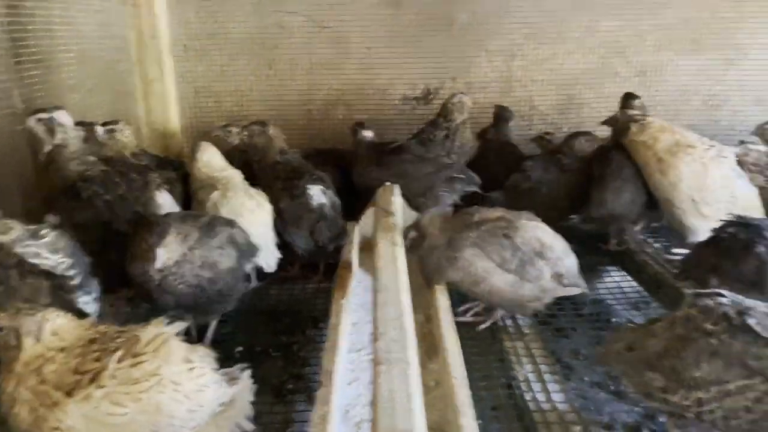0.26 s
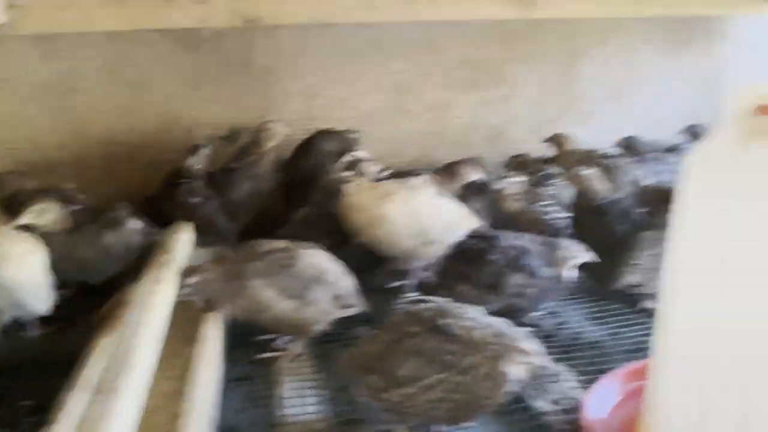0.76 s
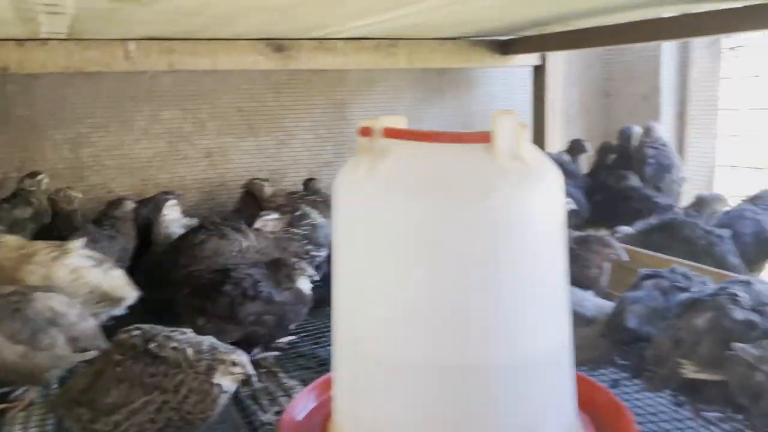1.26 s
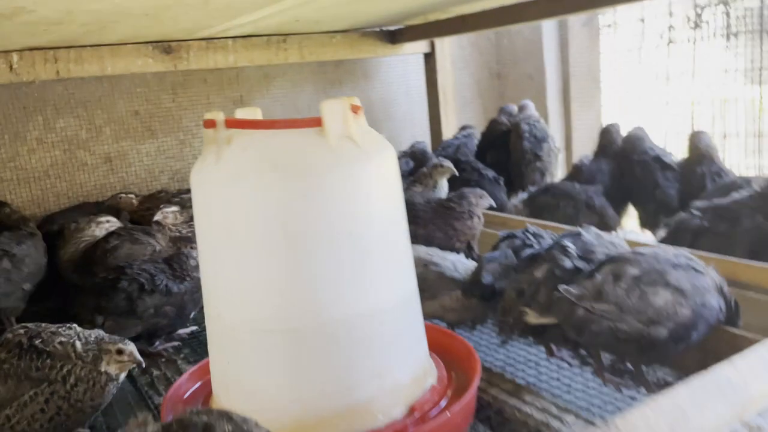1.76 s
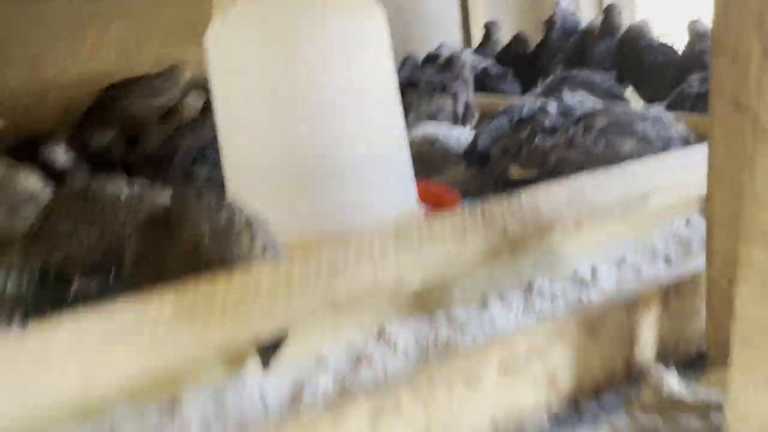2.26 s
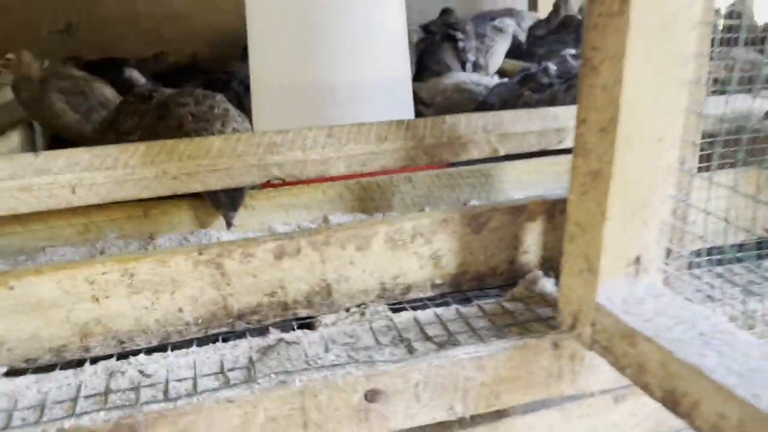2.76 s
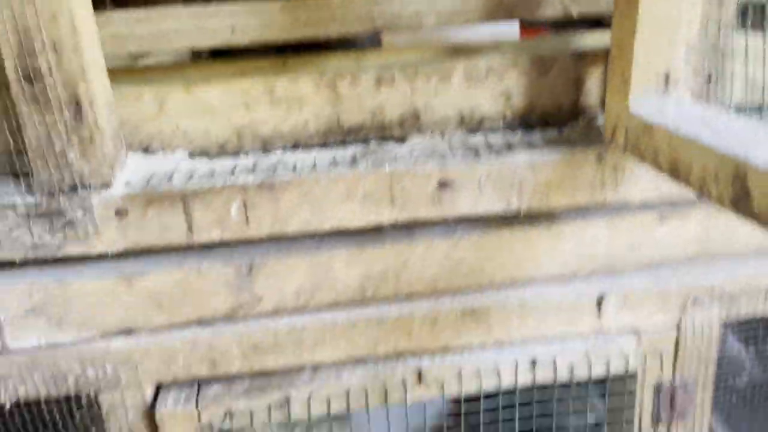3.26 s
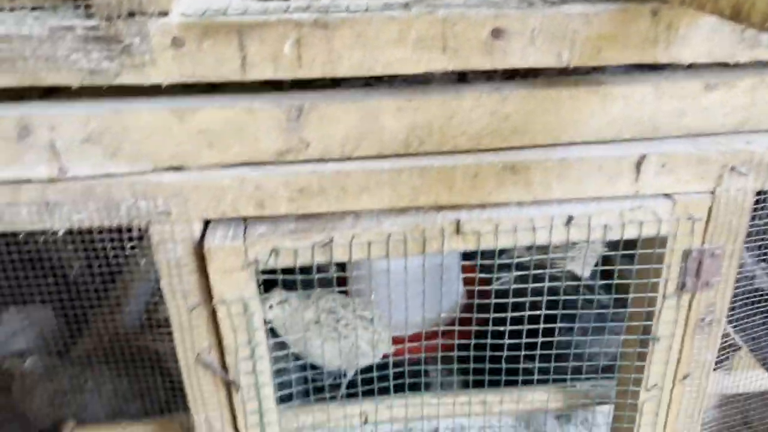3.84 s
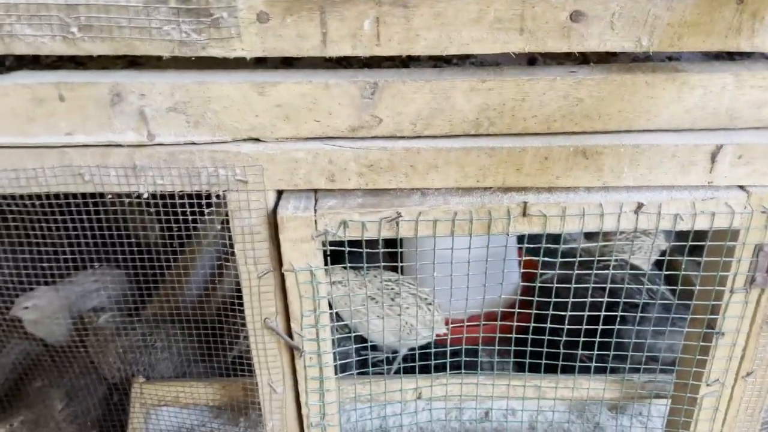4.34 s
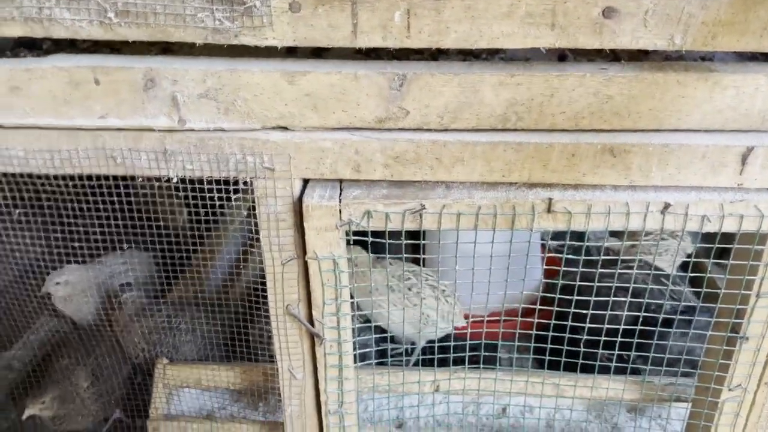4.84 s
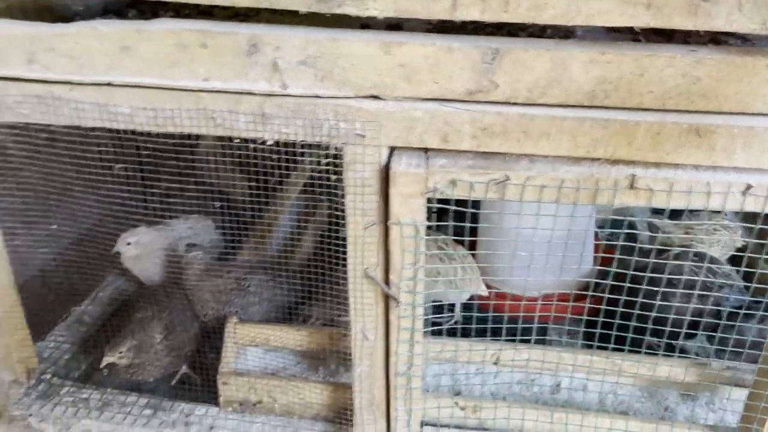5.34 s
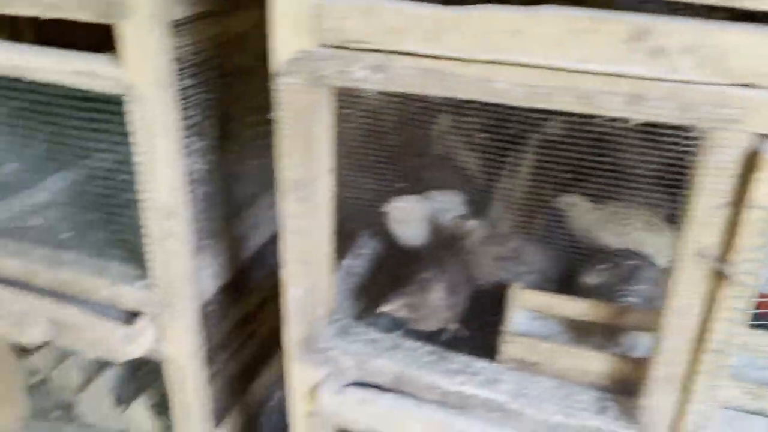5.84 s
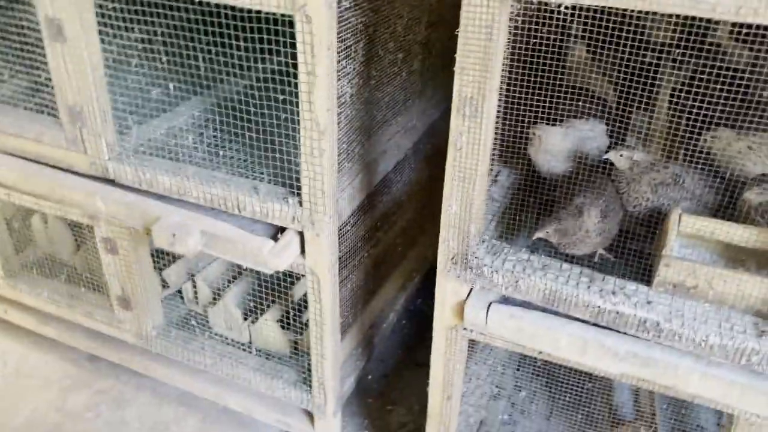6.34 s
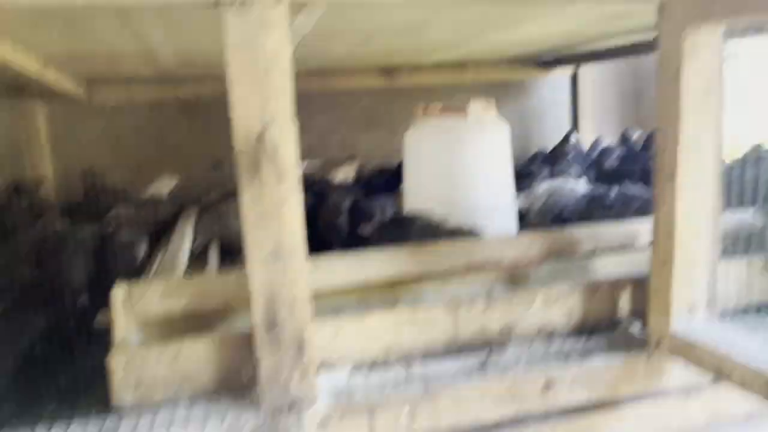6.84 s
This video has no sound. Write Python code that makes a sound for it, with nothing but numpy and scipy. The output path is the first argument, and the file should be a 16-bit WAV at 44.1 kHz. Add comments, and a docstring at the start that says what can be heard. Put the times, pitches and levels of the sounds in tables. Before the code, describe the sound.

Fast swooping quail trills burst out one after another, turning hoarse, with soft peeps, beak taps, claw clicks and a distant flock chattering over quiet rumble.

```python
"""Quail trill in wooden, wire-fronted cages in a farm shed: six trills, one after another.
Each is a whistle swooping up and down some 20 to 30 times a second; most fray into a rasp of shaped noise.
Around them: gliding chirps and soft peeps, clicks ringing a feeder board (pecks) or wire mesh (claws).
Beneath: a wavering hum, rumble and rustle of shaped noise, chatter of a farther flock, a faint far cock crow.
Caged sounds pass through quick echoes, ringing cage modes and a longer shed tail."""
import sys
import numpy as np
from scipy import signal
from scipy.fft import rfft, irfft, next_fast_len
from scipy.io import wavfile
from scipy.ndimage import uniform_filter1d, minimum_filter1d

SR = 44100
rng = np.random.default_rng(int(sys.argv[2]) if len(sys.argv) > 2 else 0)


def file_out(sig):
    """Save sig as 16-bit WAV at sys.argv[1]."""
    # one column per channel
    cols = np.atleast_2d(sig).T
    # limit, then scale
    lim = np.clip(cols, -1, 1)
    pcm = np.round(lim * 32767).astype(np.int16)
    wavfile.write(sys.argv[1], SR, pcm)


N = 313110
TIME = np.arange(N) / SR

# Shed rumble and rustle spectra: f/Hz, relative density/dB
RUMBLE_SPECTRUM = [(15, -45), (25, -26), (54, 2.5), (112, -6.5), (139, -8), (177, -1), (215, -10.5),
                   (264, -6.5), (358, -19.5), (450, -14), (580, -64), (990, -120)]
RUSTLE_SPECTRUM = [(210, -56), (350, -8.5), (497, -2), (565, -2.5), (641, -4.5), (740, -1.5), (940, -5),
                   (1160, -5), (1780, -11.5), (2870, -15.5), (3650, -22.5), (5180, -21.5), (8620, -26),
                   (13900, -15), (15800, -62)]
# Machine hum lines: f/Hz, relative level/dB
HUM_LINES = [(53.8, -58.5), (107.7, -54.5), (177.6, -51)]
# Left-right correlation of the shed noise: f/Hz, correlation/-1..1
EAR_CORRELATION = [(60, 0.75), (130, 1), (290, 0.65), (640, -0.43), (1410, 0.012), (3100, 0.22),
                   (6820, -0.76), (15000, -0.82)]
# Course of the low background, used relative to its median: t/s, level/dB
BACKGROUND_COURSE = [(0.0, -45), (0.71, -39.5), (1.01, -42.5), (1.05, -34), (1.26, -38.5), (1.34, -36),
                     (1.42, -40), (1.76, -40), (2.23, -42.5), (4.47, -40), (4.65, -40), (4.81, -51.5),
                     (4.96, -37.5), (5.04, -44), (5.22, -57), (5.57, -47.5), (7.1, -46.5)]
# Claws on the wire floor: t/s, click level/dB
CLAW_BLOWS = [(0.0387, -38), (0.4763, -41), (1.2974, -33), (1.7453, -34), (2.4112, -32.5), (3.4214, -35.5),
              (3.5129, -41), (3.7797, -33.5), (4.2727, -40), (5.9734, -37.5), (6.2144, -33.5),
              (6.2806, -31.5), (6.831, -38.5)]
# Wire tick spectrum: f/Hz, relative density/dB
WIRE_SPECTRUM = [(800, 1.5), (2000, 5.5), (5000, 2.5), (7000, -5), (9000, -15), (12000, 3.5), (15500, -5)]
# Soft peeps from the back of the cages: t/s, length/s, start f/Hz, middle f/Hz, end f/Hz, level/dB
PEEP_NOTES = [ (0.253, 0.039, 3540, 2900, 2600, -54), (1.594, 0.023, 2830, 2930, 2900, -47),
              (1.331, 0.061, 2470, 2700, 2550, -42), (1.833, 0.064, 2720, 2854, 2810, -42),
              (1.878, 0.048, 5080, 3950, 3430, -59), (2.012, 0.043, 4400, 3570, 3300, -55),
              (2.082, 0.035, 3750, 4200, 4400, -51), (3.283, 0.058, 2920, 2940, 2620, -49.5),
              (3.325, 0.065, 3430, 3073, 3240, -47), (4.398, 0.051, 2880, 2970, 2620, -41.5),
              (4.856, 0.018, 5030, 3670, 3380, -55), (6.666, 0.055, 2700, 2860, 2530, -50)]
# Chirps of nearby birds: t/s, length/s, start f/Hz, middle f/Hz, end f/Hz, level/dB, rasp/0-1,
# pan (left over right)/dB, cage echo/dB
CHIRP_NOTES = [ (0.515, 0.025, 1633, 1934, 2080, -24.5, 0.2, 2, 6),
               (0.537, 0.013, 2070, 2088, 2000, -11.5, 0, 4, -2),
               (0.541, 0.02, 1690, 1647, 1670, -19.5, 0.08, 5.5, -1),
               (0.657, 0.036, 1750, 2287, 2720, -17, 0.15, 2.5, -5),
               (.674, 0.019, 4200, 4020, 3800, -27, 0.09, 5, -6),
               (0.694, 0.026, 2454, 2724, 2400, -17.5, 0.21, 5, -9),
               (2.233, 0.046, 1440, 1720, 1485, -21.5, 0.37, 2.5, 6),
               (2.323, 0.033, 1422, 1780, 3980, -19.5, 0.38, 1, 12),
               (2.345, 0.035, 3438, 2070, 1650, -14, 0.24, 5, -1.5),
               (3.702, .040, 1370, 2160, 2720, -24, 0.57, 1.5, 4),
               (3.735, 0.059, 2160, 1604, 1360, -31.5, 0.77, 4.5, 20),
               (4.696, 0.048, 1820, 1609, 1507, -13, 0.13, 9, -10.5),
               (5.879, 0.027, 1260, 1282, 1380, -32.5, 0.44, 3, 13),
               (5.978, 0.043, 1442, 1892, 1500, -33.5, 0.38, 0, 18)]
# Bird behind each trill: start t/s, end t/s, turn to late hoarseness t/s, swoop/octaves,
# early hoarseness/0-1, late hoarseness/0-1, crest shake/0-1, overtones/dB, facing/0-1,
# top octave/dB, pan (left over right)/dB, left lag/ms, cage echo/dB
TRILL_BIRDS = [ (0.825, 1.216, 1.01, 0.62, 0.05, 0.73, 0.34, -20.5, 0.15, 3, 4, 0.0083, 5.5),
               (2.528, 2.869, 3.04, 0.76, 0.21, 0.05, 0.52, -32, 0.05, -1.5, 2.5, -0.052, 1.5),
               (3.858, 4.305, 4.12, 0.78, 0.24, 0.83, 0.57, -32, 0, -2.5, 3, 0.21, 3.5),
               (4.991, 5.435, 5.21, 1.093, 0.03, 0.55, 0.48, -23.5, 0.65, 2.5, 6.5, 0.081, -7.5),
               (5.461, 5.89, 5.765, .64, .12, 0.87, 0.45, -32, 0.02, -0.5, 2, -.65, -1),
               (6.111, 6.512, 6.37, 0.63, 0.15, 0.87, 0.51, -21.5, 0.08, 0, 3, 0.34, 5.5)]
# Trill syllables, a low note and the crest after it: t/s, note f/Hz, note level/dB, crest level/dB
TRILL_SYLLABLES = [ (.833, 1900, -19, -20), (.868, 2395, -18, -17.5), (0.905, 2480, -18, -21),
                   (.944, 2750, -16.5, -17), (0.983, 2850, -22.5, -23), (1.02, 3036, -16.5, -27),
                   (1.058, 3080, -20, -28), (1.091, 3000, -22, -24), (1.125, 2890, -23, -24.5),
                   (1.159, 2750, -25, -26.5), (2.538, 1450, -42.5, -18.5), (2.58, 1751, -22, -16.5),
                   (2.626, 1800, -21, -16), (2.674, 1916, -17.5, -16), (2.722, 1786, -20.5, -16.5),
                   (2.767, 1842, -17.5, -23.5), (2.812, 1770, -25.5, -32), (3.868, 1250, -27, -34.5),
                   (3.905, 1551, -19.5, -26), (3.943, 1610, -19, -27), (3.987, 1739, -19.5, -25),
                   (4.027, 1857, -15, -26), (4.066, 1881, -15, -31), (4.102, 1881, -19.5, -26),
                   (4.137, 1877, -28, -22.5), (4.174, 1874, -32, -24.5), (4.211, 1704, -32, -31.5),
                   (4.245, 1584, -36, -45), (5.008, 1450, -13, -14.5), (5.052, 1694, -11, -25),
                   (5.1, 1626, -16.5, -24.5), (5.143, 1762, -11, -29.5), (5.19, 1800, -14.5, -27.5),
                   (5.234, 1820, -14.5, -26.5), (5.282, 1820, -21.5, -24), (5.325, 1813, -23.5, -25.5),
                   (5.365, 1666, -29, -28), (5.466, 1677, -25.5, -31), (5.497, 1814, -25, -32.5),
                   (5.538, 2097, -24.5, -34.5), (5.578, 1920, -20, -34.5), (5.617, 1938, -21, -38),
                   (5.659, 1962, -19, -36.5), (5.702, 2073, -20.5, -36), (5.74, 2158, -23, -36),
                   (5.778, 2220, -26.5, -29.5), (5.816, 1993, -34.5, -35), (5.858, 1656, -31.5, -26.5),
                   (6.123, 1530, -38.5, -36.5), (6.162, 1890, -27, -29), (6.202, 1973, -27, -28),
                   (6.243, 1973, -22.5, -27), (6.285, 2046, -23, -35), (6.326, 2177, -19, -30),
                   (6.367, 2168, -30.5, -27.5), (6.405, 2108, -33, -29.5), (6.447, 1915, -33, -41)]
# Hoarse noise of the voice: f/Hz, relative density/dB
RASP_SPECTRUM = [(350, -64), (600, -19), (757, -5), (1210, -8), (1600, 7), (1900, -1), (3230, 1),
                 (3900, -0.5), (4500, -8), (5100, -7.5), (5820, -22), (6950, -19.5), (8300, -85),
                 (8650, -69), (10500, -21.5), (12900, -22.5), (15800, -32)]
# Low throat resonance in the hoarse voice: f/Hz, relative density/dB
THROAT_SPECTRUM = [(700, -26), (1050, -18), (1270, 18.5), (1650, 13.5), (2200, -20), (4000, -61)]
# Colour of the whistle as heard, the treble deeply dipped near 9 kHz: f/Hz, gain/dB
WHISTLE_GAIN = [(1000, 4), (2000, 5), (2700, 0.5), (3500, 0.5), (4400, 4), (5250, 14), (6000, 2), (7200, 6.5),
                (9000, -19), (11000, 5), (13000, 16), (15500, -14)]
# Colour of a close bird fully facing the listener: f/Hz, gain/dB
FACING_GAIN = [(750, -22), (1250, -9.5), (1700, -1.5), (3400, 5.5), (4300, -6.5), (5400, 9.5), (6500, 3),
               (11500, 0)]
# Beaks on the feeder boards: t/s, click level/dB
PECK_BLOWS = [(0.886, -28.5), (2.225, -30.5), (2.316, -24), (2.867, -21), (3.15, -40.5), (3.201, -35.5),
              (3.425, -35.5), (3.442, -36), (3.676, -34), (3.784, -34.5), (3.83, -37), (4.353, -39),
              (6.123, -38)]
# Feeder board modes: f/Hz, level/dB, t60/s
BOARD_MODES = [(574, -10, 0.028), (764, 1, 0.032), (1022, 2, 0.025), (1131, 3.5, 0.043), (1236, 12, 0.011),
               (2010, 0, 0.0098)]
# Far cock crow: t/s, length/s, mid-note f/Hz, level/dB
CROW_NOTES = [(1.964, 0.2, 572, -44), (2.297, .1, 560, -42.5)]
# Standing waves between the cage boards: f/Hz
CAGE_MODES_HZ = [1587, 2024, 2140, 2380, 2650, 2944, 3700, 3800, 4900]

CAGE_T60_S, SHED_T60_S, SHED_RE_CAGE_DB = 0.11, 0.26, -5
MODE_T60_S, MODE_RE_CAGE_DB = 0.36, -22
RUMBLE_DB, RUSTLE_DB = -46.5, -46.5
ATTACK_S, RELEASE_S = 0.011, 0.056
FRAY_S = 0.045          # time constant of the turn to late hoarseness
CUTOFF_HZ = 15850


def from_db(db):
    """Decibels to amplitude gain."""
    return 10 ** (np.asarray(db) / 20)


def rms_one(x):
    """Scale to unit rms."""
    return x / np.sqrt(np.mean(x ** 2) + 1e-20)


def at_hz(points, size):
    """Interpolate a (f/Hz, value) table over log frequency at the transform bins."""
    hz, value = np.transpose(points)
    return np.interp(np.log(np.fft.rfftfreq(size, 1 / SR) + 1), np.log(hz), value)


def colour(x, spectrum):
    """Zero-phase filter by a (f/Hz, gain/dB) table."""
    size = next_fast_len(x.shape[-1] + 1000)
    gain = from_db(at_hz(spectrum, size))
    return irfft(rfft(x, size) * gain, size)[..., :x.shape[-1]]


def wander(rate_hz, size):
    """Unit-rms noise through a two-pole lowpass: smooth random drift."""
    pole = np.exp(-2 * np.pi * rate_hz / SR)
    noise = rng.standard_normal(size + SR // 4)
    return rms_one(signal.lfilter([1], [1, -2 * pole, pole * pole], noise)[-size:])


def add(out, start_s, sound):
    """Mix a sound in from start_s."""
    start = max(int(start_s * SR), 0)
    out[..., start:start + sound.shape[-1]] += sound[..., :N - start]


def dying_noise(t60_s):
    """Dense reflections per ear: spectrally flattened decaying noise with a soft onset, unit energy."""
    t = TIME[:SR // 2]
    onset = 1 - np.exp(-(t / 0.00087) ** 2)
    noise = rng.standard_normal((2, len(t)))
    spectrum = rfft(noise * from_db(-60 * t / t60_s) * onset, SR)
    smooth_power = uniform_filter1d(np.abs(spectrum) ** 2, size=160)
    tail = irfft(spectrum / np.sqrt(smooth_power), SR)[:, :len(t)]
    return tail / np.sqrt(np.sum(tail ** 2, axis=1, keepdims=True))


def standing_waves():
    """Decaying sines at the cage modes, random phase per ear, unit energy."""
    t = TIME[:SR // 3]
    modes = sum(np.sin(2 * np.pi * (hz * t + rng.random((2, 1)))) for hz in CAGE_MODES_HZ)
    ring = modes * from_db(-60 * t / MODE_T60_S)
    return ring / np.sqrt(np.sum(ring ** 2, axis=1, keepdims=True))


def in_cage(sound, pan_db, lag_ms, echo_db):
    """Convolve with the direct path, cage echoes, cage modes and shed tail."""
    reflections = dying_noise(CAGE_T60_S) + from_db(SHED_RE_CAGE_DB) * dying_noise(SHED_T60_S)
    paths = from_db(echo_db) * reflections
    add(paths, 0, from_db(echo_db + MODE_RE_CAGE_DB) * standing_waves())
    lag = int(round(lag_ms * SR / 1000))    # positive delays the left ear
    paths[0, max(lag, 0)] += 1
    paths[1, max(-lag, 0)] += 1
    paths *= from_db([[pan_db / 2], [-pan_db / 2]]) / np.sqrt(1 + from_db(echo_db) ** 2)
    return signal.fftconvolve(sound[None], paths, axes=1)[:, :N]


def syrinx(pitch_hz, shake, hoarse, overtone_db, jitter, sizzle_db):
    """Whistle with overtones; shake adds jitter, flutter and a half-pitch tone, hoarseness adds noise."""
    size, shake, hoarse = len(pitch_hz), np.clip(shake, 0, 1), np.clip(hoarse, 0, 1)
    shaken_hz = pitch_hz * (1 + jitter * shake * wander(389, size))
    phase = 2 * np.pi * np.cumsum(shaken_hz) / SR
    overtones = 0
    for k in range(2, 6):
        below_nyquist = k * pitch_hz < SR / 2
        overtones = overtones + from_db(overtone_db - 5 * (k - 0.5)) * np.sin(k * phase) * below_nyquist
    half_tone = from_db(-12) * shake * np.sin(phase / 2)
    flutter = 1 + np.sqrt(shake) * wander(247, size)
    whistle = colour(np.sin(phase) + half_tone + overtones, WHISTLE_GAIN) * flutter
    rasp = rms_one(colour(rng.standard_normal(size), RASP_SPECTRUM))
    throat = rms_one(colour(rng.standard_normal(size), THROAT_SPECTRUM))
    voice = np.sqrt(1 - hoarse ** 2) * rms_one(whistle) + hoarse * rasp
    voice = voice + from_db(-10) * np.sqrt(hoarse) * throat
    return colour(voice, [(5500, 0.0068), (11500, sizzle_db)])


def chirp(length_s, pitches_hz, rasp):
    """One glide, quadratic in log pitch through three pitches, under an arched envelope."""
    u = np.clip(TIME[:SR // 10] / length_s, 0, 1)
    pitch_hz = np.exp(np.polyval(np.polyfit([0, .5, 1], np.log(pitches_hz), 2), u))
    envelope = np.abs(np.sin(np.pi * u ** 0.73)) ** 0.79
    return envelope * syrinx(pitch_hz, rasp, 0.27 * rasp, overtone_db=-25, jitter=0.316, sizzle_db=6.0)


def background_db():
    """Background level relative to its median."""
    level_db = np.interp(TIME, *np.transpose(BACKGROUND_COURSE))
    return level_db - np.median(level_db)


def stereo_noise(spectrum):
    """Shaped noise: mid and side weighted to set the correlation of the ears by frequency."""
    size = next_fast_len(N)
    mid, side = rfft(rng.standard_normal((2, size)))
    alike = np.clip(at_hz(EAR_CORRELATION, size), -1, 1)
    ears = irfft(np.sqrt(1 + alike) * mid + np.sqrt(1 - alike) * side * [[1], [-1]], size)
    return rms_one(colour(ears[:, :N], spectrum))


def flock(count=260, level_db=-58.5, low_hz=2400, fall_oct=.17, arch_oct=.2):
    """Chatter of farther birds: random thin glides, most falling, arched or dipping, higher ones fainter."""
    shortest_s, longest_s = .02, .06
    out = np.zeros(N)
    for when, length, height_oct, slope, bend, loud in rng.random((count, 6)):
        glide_oct = fall_oct * (3 * slope - 1) * np.array([1, 0, -1])
        glide_oct = glide_oct + arch_oct * (2 * bend - 1) * np.array([0, 1, 0])
        length_s = shortest_s + (longest_s - shortest_s) * length
        note = chirp(length_s, low_hz * 2 ** (height_oct + glide_oct), rasp=.06)
        add(out, when * TIME[-1], from_db(level_db + 10 * (loud - height_oct)) * note)
    return in_cage(out, pan_db=1, lag_ms=0, echo_db=-3)


def shed(hum_gain_db=-1.5, waver=0.0357, rustle_follows=0.81):
    """Hum lines drifting in pitch and level, rumble, flickering feather rustle and flock chatter."""
    hum = 0
    for hz, db in HUM_LINES:
        line_gain = from_db(db + 5.8 * wander(9.3, N))
        line_hz = hz * (1 + waver * wander(6.5, N))
        hum = hum + line_gain * np.sin(2 * np.pi * np.cumsum(line_hz) / SR)
    rumble = from_db(RUMBLE_DB) * stereo_noise(RUMBLE_SPECTRUM)
    flicker_db = 2.0 * wander(10, N)
    rustle = from_db(RUSTLE_DB + flicker_db) * stereo_noise(RUSTLE_SPECTRUM)
    swell_db = background_db()
    low = from_db(swell_db) * (rumble + np.sqrt(2) * from_db(hum_gain_db) * hum)
    return low + from_db(rustle_follows * swell_db) * (rustle + flock())


def blows(rows, per_s, faint_db, follows=0.84):
    """Listed clicks among random faint ones whose level follows the background."""
    faint = faint_db + follows * background_db() + rng.uniform(-7, 7, N)
    clicks = (rng.random(N) < per_s / SR) * from_db(faint)
    for s, level_db in rows:
        clicks[int(s * SR)] += from_db(level_db)
    return clicks


def claws(gain_db=-4, t60_s=.028):
    """Claws flick the wire mesh: each click starts a decaying burst of bright noise."""
    t = TIME[:SR // 20]
    tick = colour(rng.standard_normal(len(t)), WIRE_SPECTRUM) * from_db(-60 * t / t60_s)
    ticks = signal.fftconvolve(blows(CLAW_BLOWS, per_s=61, faint_db=-50.5), tick)[:N]
    return from_db(gain_db) * in_cage(ticks, pan_db=10.0, lag_ms=0, echo_db=-28)


def peeps():
    """Quiet contact notes: clear glides without rasp."""
    out = np.zeros(N)
    for s, length_s, start_hz, middle_hz, end_hz, level_db in PEEP_NOTES:
        add(out, s, from_db(level_db) * chirp(length_s, [start_hz, middle_hz, end_hz], rasp=0))
    return in_cage(out, pan_db=-1.5, lag_ms=.05, echo_db=-10)


def chirps(lag_ms=0.3):
    """Single glides from nearby birds, each with its own pan and echo."""
    out = np.zeros((2, N))
    for s, length_s, start_hz, middle_hz, end_hz, level_db, rasp, pan_db, echo_db in CHIRP_NOTES:
        note = from_db(level_db) * chirp(length_s, [start_hz, middle_hz, end_hz], rasp)
        add(out, s, in_cage(note, pan_db, lag_ms, echo_db))
    return out


def trills(crest_shape=1.15, rise_skew=0.04995, accent_db=3.0, crest_hiss=0.88, jitter=0.1402,
           top_hz=5200, burst_lead_cycles=0.03, first_shake=0.27, dip_db=4.0, gain_db=0.38):
    """Each syllable dwells low, is pushed on its upstroke, breaks up at the crest and falls back."""
    out = np.zeros((2, N))
    for (start, end, hoarse_s, swoop_oct, early, late, crest_shake, overtone_db, facing,
         sizzle_db, pan_db, lag_ms, echo_db) in TRILL_BIRDS:
        rows = [row for row in TRILL_SYLLABLES if start - ATTACK_S < row[0] < end]
        s, note_hz, note_db, crest_db = np.transpose(rows)
        t = start + TIME[:int((end - start) * SR)]
        beats = np.concatenate([[2 * s[0] - s[1]], s, [2 * s[-1] - s[-2]]])
        cycle = np.interp(t, beats, np.arange(len(beats)) - 1)      # whole at each low note
        begun = np.maximum(cycle, 0)
        turn = begun + rise_skew * np.sin(np.pi * cycle) ** 2
        lift = np.abs(np.sin(np.pi * turn)) ** (2 * crest_shape)    # 0 at the bottom, 1 at the crest
        swoop_now_oct = swoop_oct * (1 + 0.0809 * wander(24.4, len(t))) * lift
        pitch_hz = np.minimum(np.interp(t, s, note_hz) * 2 ** swoop_now_oct, top_hz)

        burst = crest_shake * np.sin(np.pi * (begun + burst_lead_cycles)) ** 4
        turned = (1 + np.tanh((t - hoarse_s) / FRAY_S)) / 2
        hoarse = np.clip(early + (late - early) * turned, 0, 1)
        shake = hoarse + burst + first_shake * (cycle < .5)
        hiss = hoarse + crest_hiss * burst * (1 - hoarse)

        crest_db = np.interp(cycle, np.arange(len(s)) + .5, crest_db)
        upstroke_db = accent_db * np.sin(2 * np.pi * cycle) * (1 - hoarse)
        low_db = np.interp(t, s, note_db) + upstroke_db
        slack = np.sin(np.pi * (cycle - 1 / 4)) ** 6                # peaks as the voice falls back
        effort = from_db((1 - lift) * low_db + lift * crest_db - dip_db * slack + gain_db)
        gate = np.interp(t, [start, start + ATTACK_S, end - RELEASE_S, end], [0, 1, 1, 0])

        voice = gate * effort * syrinx(pitch_hz, shake, hiss, overtone_db, jitter, sizzle_db)
        voice = colour(voice, [(hz, facing * db) for hz, db in FACING_GAIN])
        add(out, start, in_cage(voice, pan_db, lag_ms, echo_db))
    return out


def pecks(contact_s=0.0015):
    """Beaks excite short, woody feeder modes: decaying sines with a soft contact onset."""
    t = TIME[:SR // 8]
    ring = 0
    for k, (hz, db, t60_s) in enumerate(BOARD_MODES):
        ring = ring + (-1) ** k * from_db(db - 60 * t / t60_s) * np.sin(2 * np.pi * hz * t)
    ring = ring * (1 - np.exp(-t / contact_s))
    knocks = signal.fftconvolve(blows(PECK_BLOWS, per_s=15, faint_db=-52.0), ring)[:N]
    return in_cage(knocks, pan_db=8.5, lag_ms=.1, echo_db=-10.5)


def crow(rise_per_s=0.31, octave_db=-10, edge_s=0.023):
    """Far cock: two held notes creeping upward, each with an octave overtone."""
    out = np.zeros(N)
    for s, length_s, hz, level_db in CROW_NOTES:
        t = TIME[:int(length_s * SR)]
        pitch_hz = hz * (1 + rise_per_s * (t - length_s / 2) + 0.012 * wander(24.0, len(t)))
        phase = 2 * np.pi * np.cumsum(pitch_hz) / SR
        gate = np.clip(np.minimum(t, length_s - t) / edge_s, 0, 1)
        add(out, s, from_db(level_db) * gate * (np.sin(phase) + from_db(octave_db) * np.sin(2 * phase)))
    return out


def scene():
    """Sum of shed, claws, voices, beaks and crow."""
    return shed() + claws() + peeps() + chirps() + trills() + pecks() + crow()


def record(dry, narrow_db=-12, ceiling=.92):
    """Narrow the stereo image in the treble, limit peaks, cut steeply above CUTOFF_HZ."""
    mid = (dry[0] + dry[1]) / 2
    side = colour((dry[0] - dry[1]) / 2, [(9500, 0), (11500, narrow_db)])
    ears = np.array([mid + side, mid - side])
    safe_gain = np.minimum(1, ceiling / (np.abs(ears).max(axis=0) + 1e-9))
    limiter = uniform_filter1d(minimum_filter1d(safe_gain, size=400), size=400)
    lowpass = signal.ellip(10, .1, 80, CUTOFF_HZ, fs=SR, output="sos")
    return signal.sosfilt(lowpass, limiter * ears)


dry = scene()
out = record(dry)
file_out(out)
```